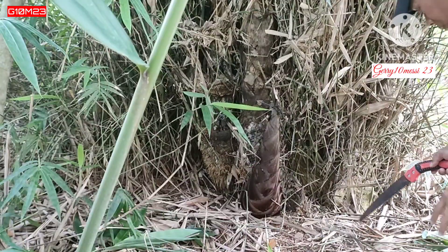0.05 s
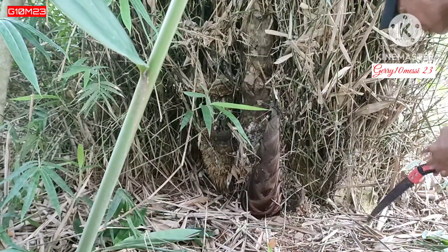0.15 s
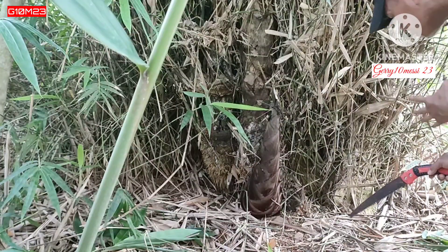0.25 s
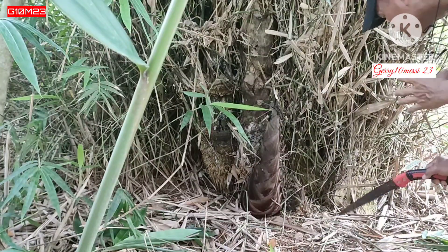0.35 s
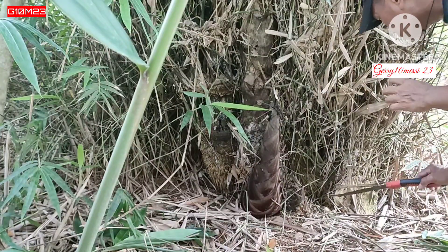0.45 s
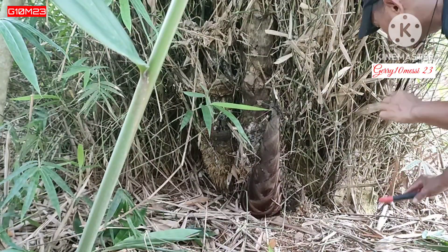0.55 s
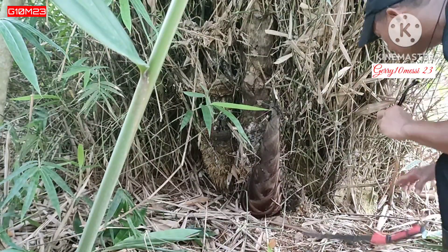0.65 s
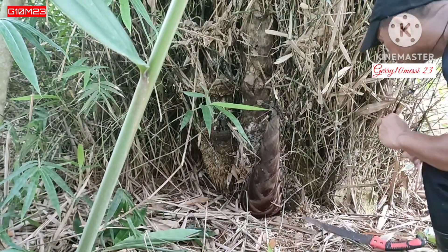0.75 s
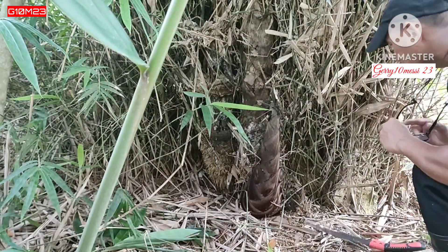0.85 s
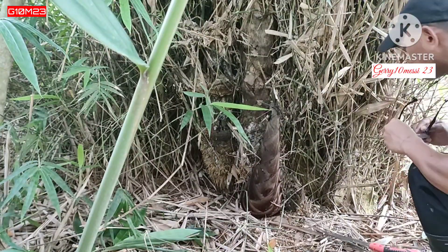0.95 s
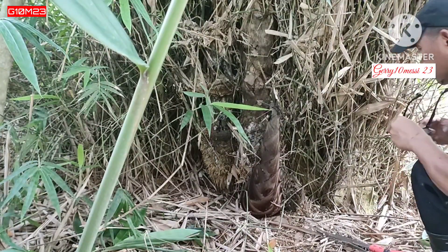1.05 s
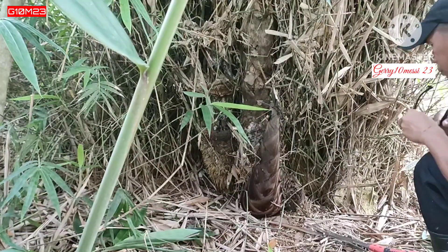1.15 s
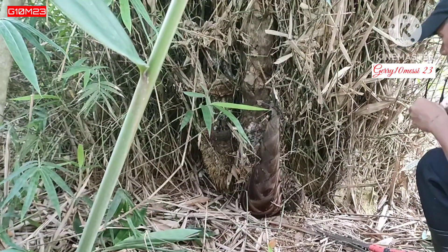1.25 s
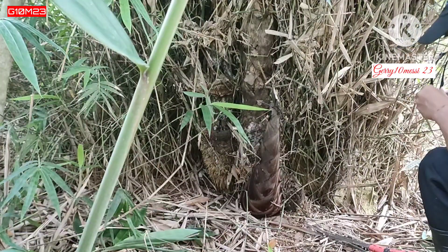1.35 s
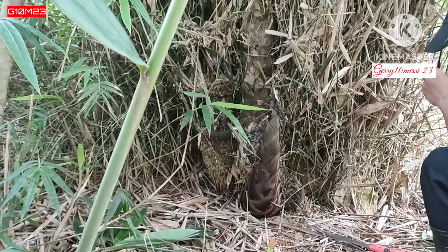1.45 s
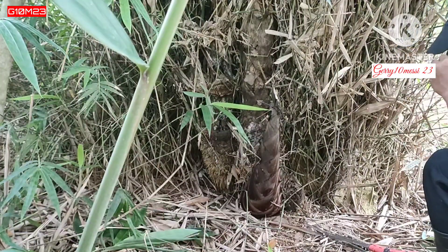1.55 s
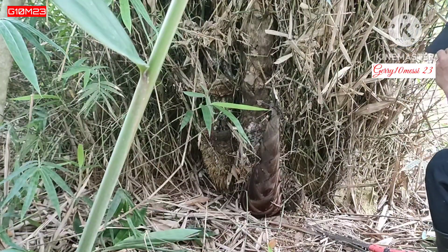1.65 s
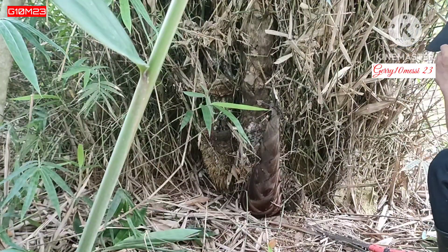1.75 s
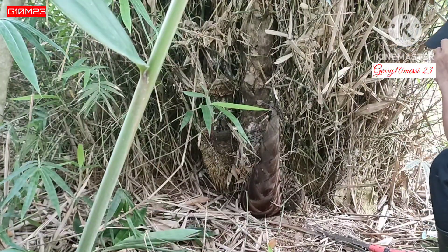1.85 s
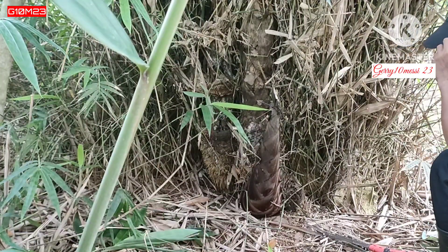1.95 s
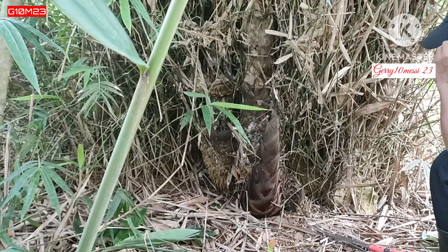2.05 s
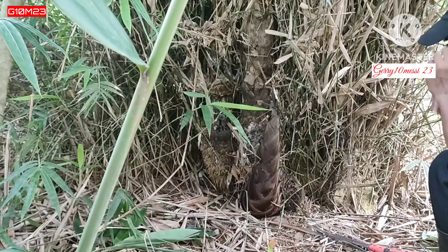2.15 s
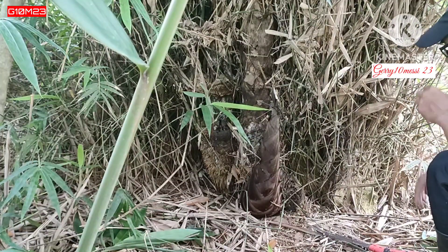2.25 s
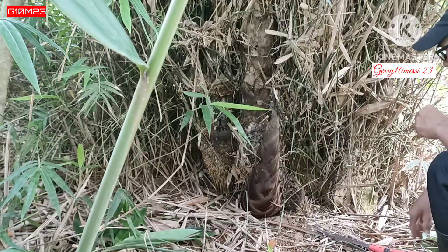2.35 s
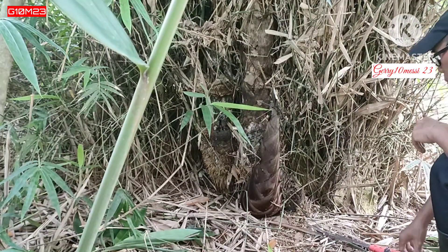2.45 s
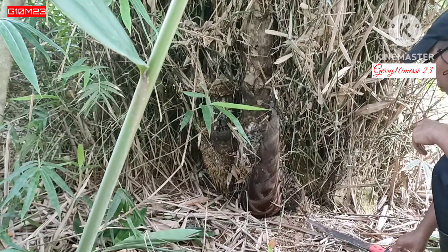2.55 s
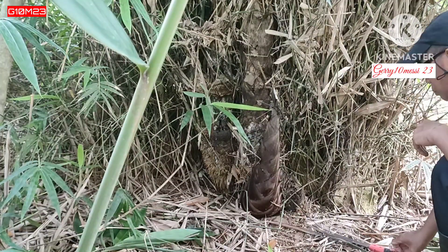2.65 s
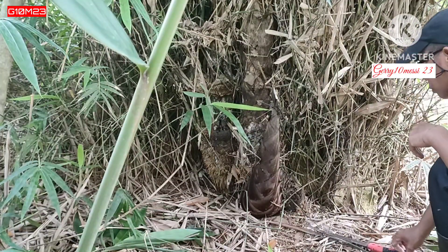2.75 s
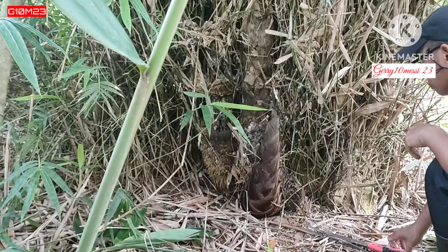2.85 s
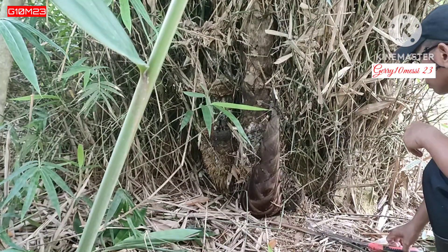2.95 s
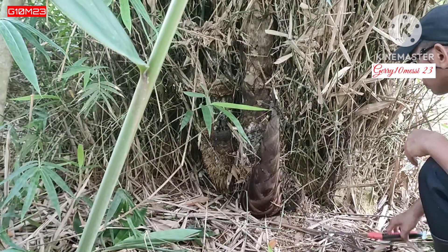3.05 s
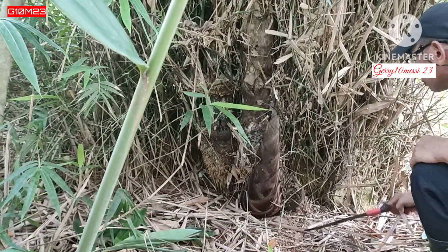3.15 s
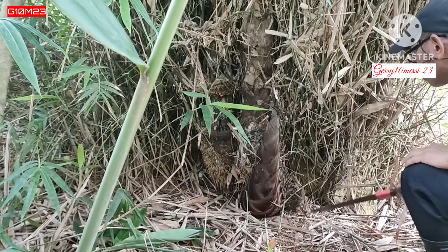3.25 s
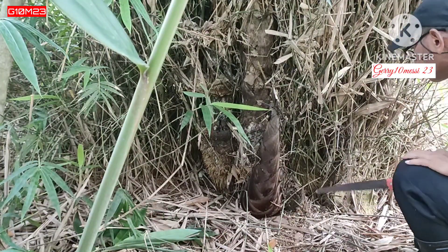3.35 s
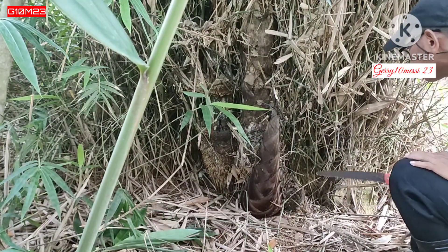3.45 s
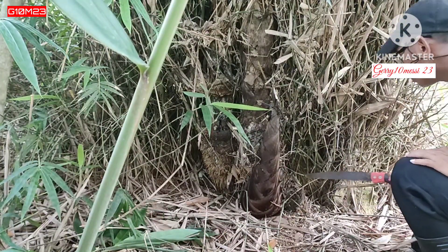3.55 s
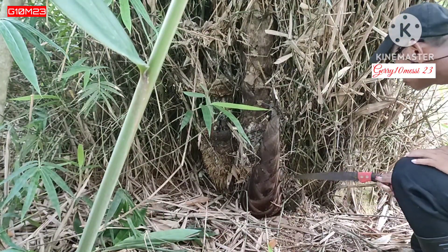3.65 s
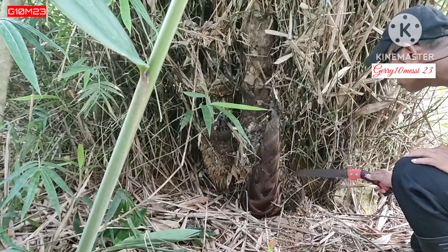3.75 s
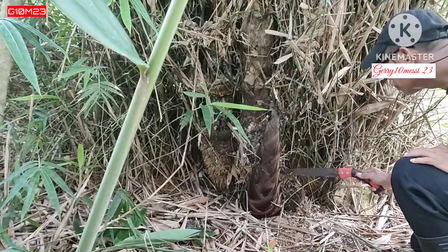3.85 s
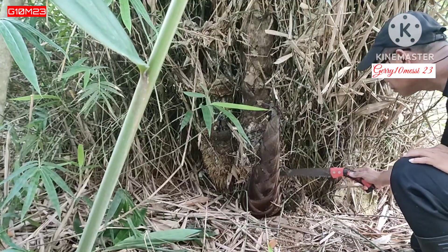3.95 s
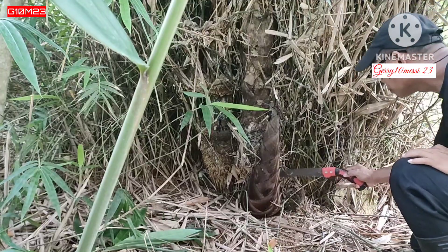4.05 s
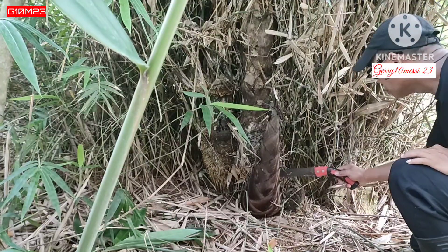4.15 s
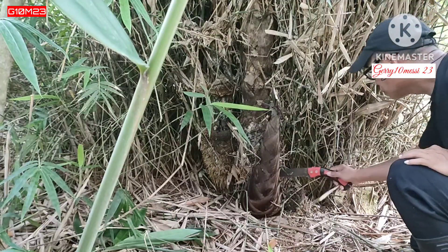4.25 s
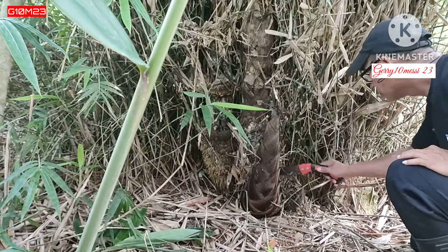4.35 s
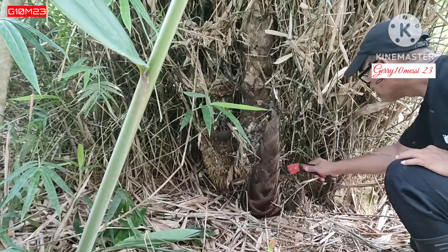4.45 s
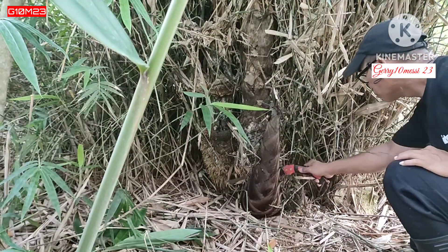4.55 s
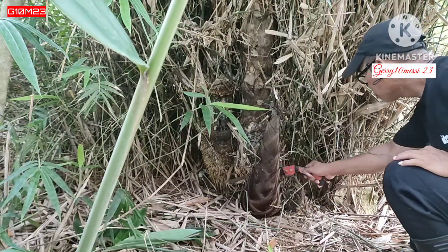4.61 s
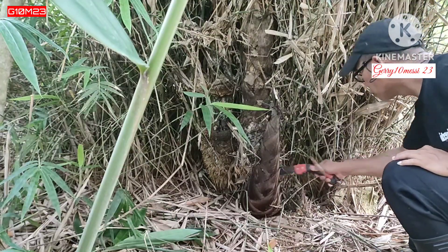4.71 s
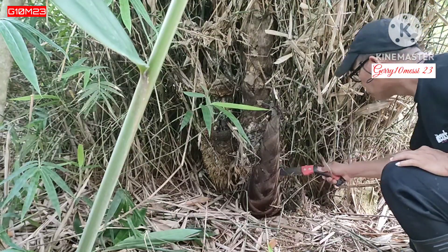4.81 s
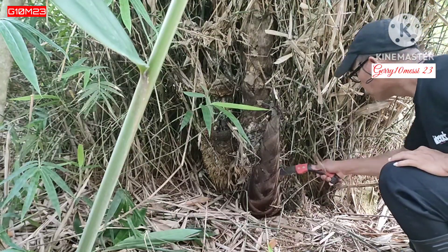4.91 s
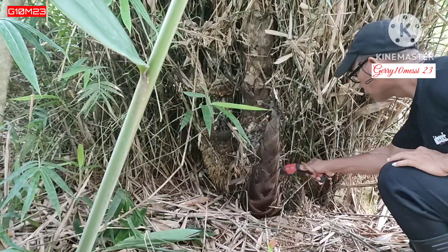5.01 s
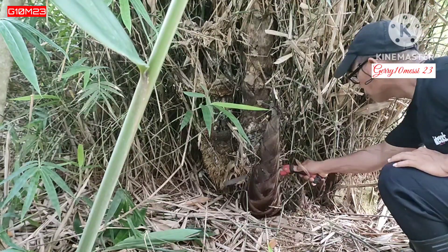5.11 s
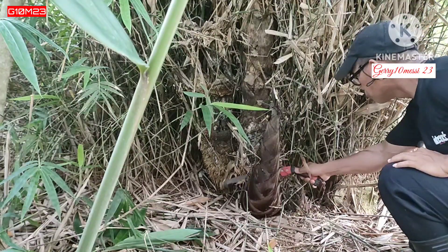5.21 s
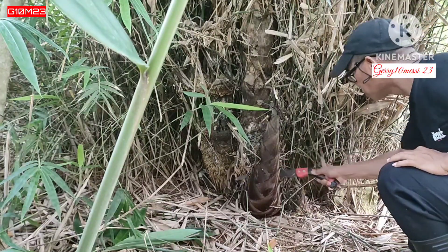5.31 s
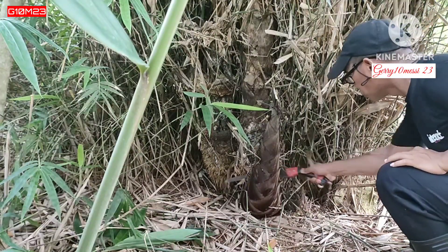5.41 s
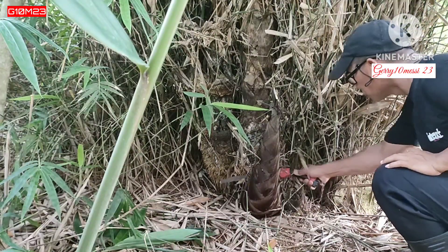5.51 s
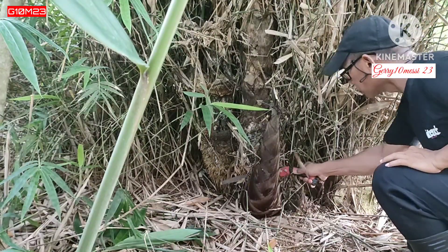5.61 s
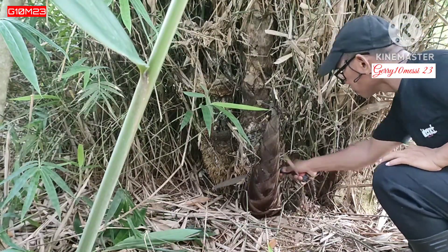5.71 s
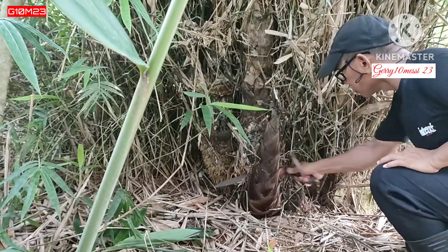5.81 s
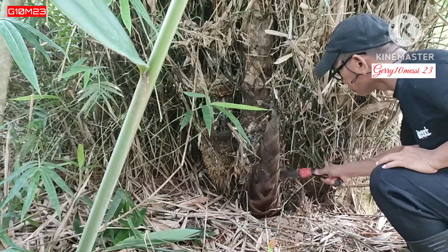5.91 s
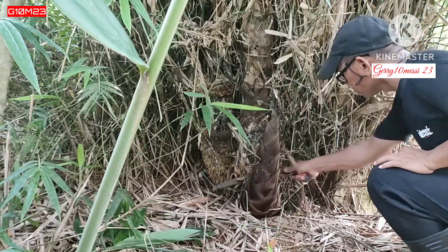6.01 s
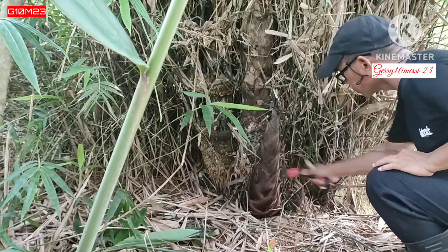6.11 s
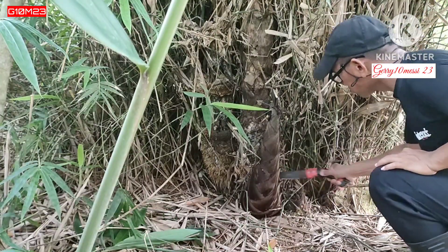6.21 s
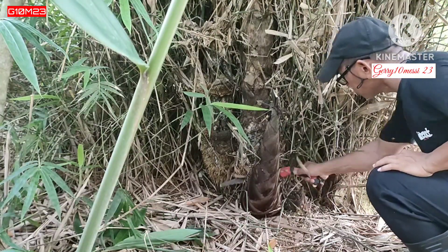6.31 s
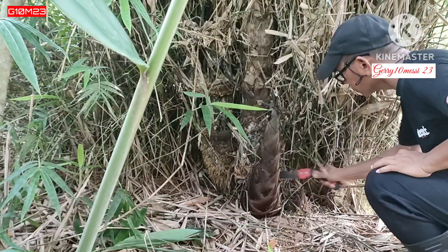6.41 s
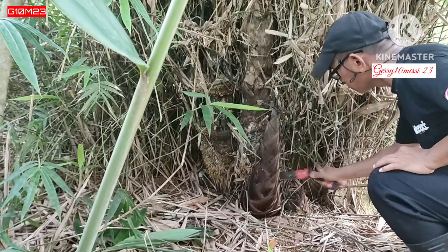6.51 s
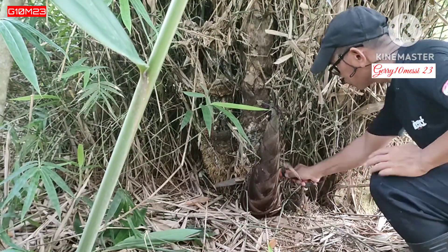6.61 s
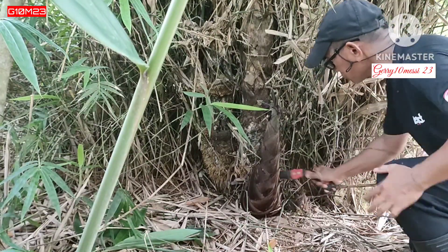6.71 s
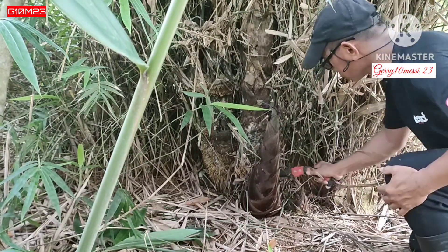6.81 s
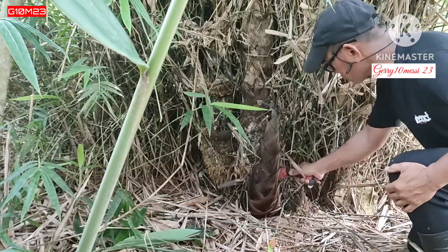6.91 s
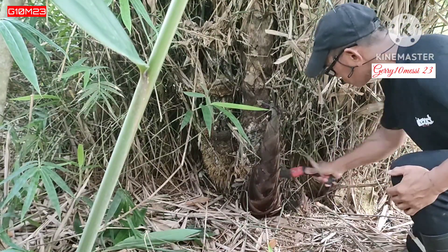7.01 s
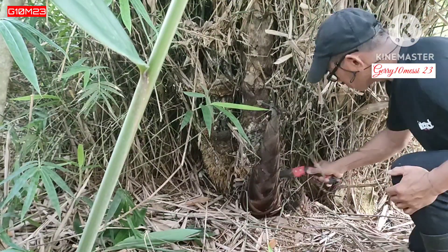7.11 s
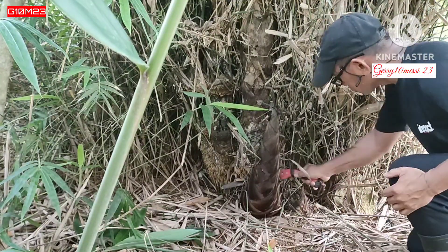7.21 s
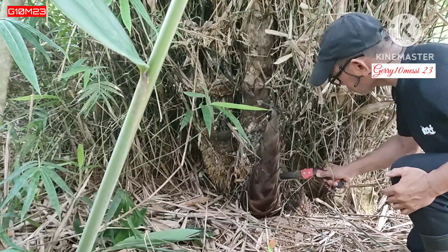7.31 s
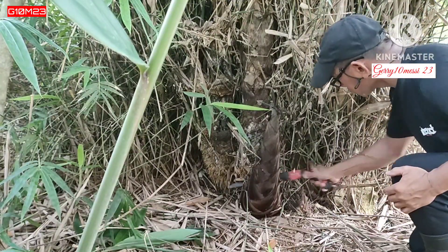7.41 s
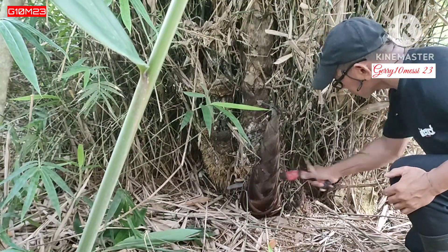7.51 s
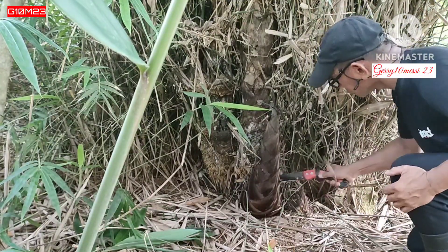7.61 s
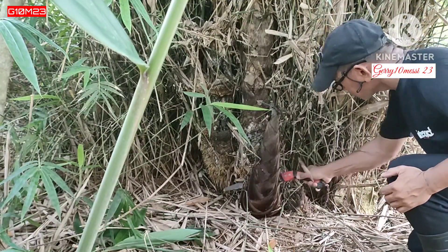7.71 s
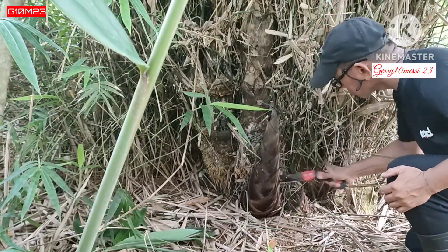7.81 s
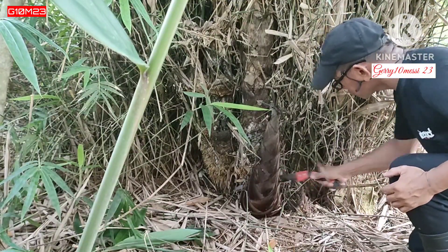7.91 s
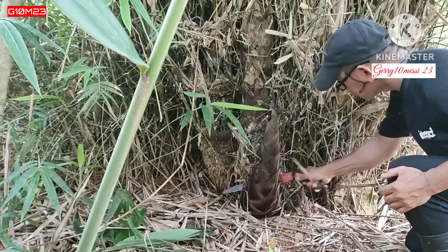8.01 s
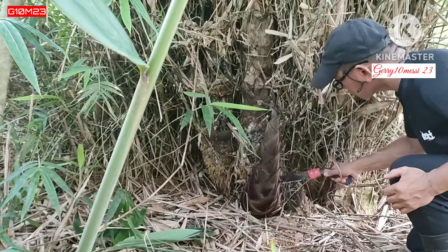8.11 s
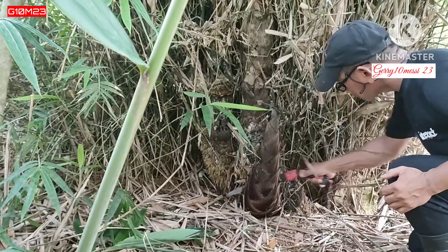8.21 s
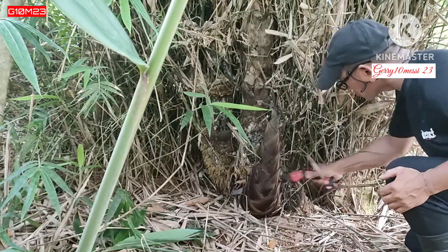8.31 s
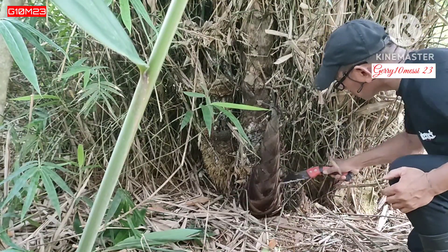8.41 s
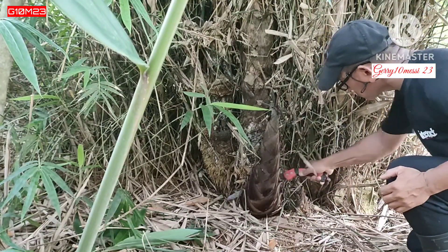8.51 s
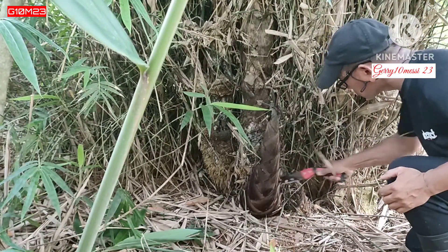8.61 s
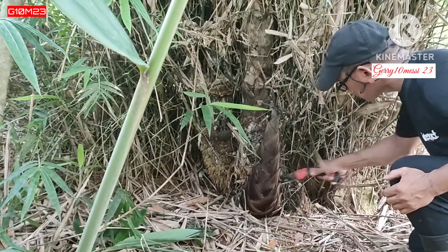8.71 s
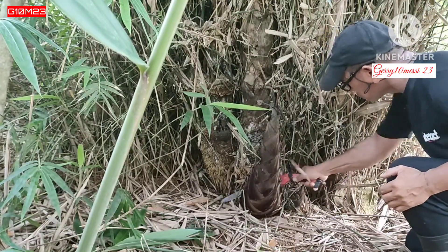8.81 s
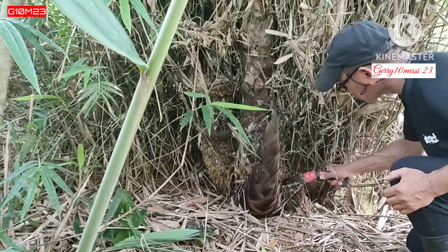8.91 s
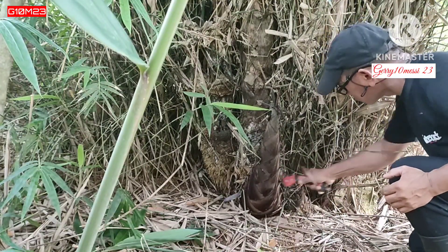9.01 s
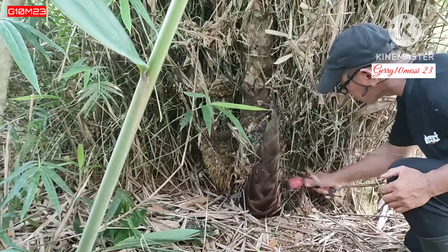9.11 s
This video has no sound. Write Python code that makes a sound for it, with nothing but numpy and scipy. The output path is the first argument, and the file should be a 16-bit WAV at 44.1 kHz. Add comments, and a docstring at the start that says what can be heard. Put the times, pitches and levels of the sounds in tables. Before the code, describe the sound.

In a bamboo grove with a low hiss of cicadas and far traffic, a microphone a couple of metres away picks up rustling dry litter and cracking twigs. A brief, faint bird call and lighter rustles follow. Then a pruning saw bites into a thick shoot with a few slow, light strokes and settles into a fast back-and-forth rasp, dotted with sharp snaps of tearing fibres.

```python
"""A bamboo grove, heard from two metres on a phone with two microphone ports and gain control.
Far traffic rumbles and cicadas hiss throughout. A pruning saw is laid on dry litter and twigs crack.
A bird calls around 2 s, then the leaves stir as the saw is picked up. From 4.4 s to 9.2 s it is drawn
to and fro through a thick shoot, cautiously at first. Its teeth tear fibres: dense ticks ring the blade,
the tooth beat drums the shoot, tough fibres snap."""
import sys
import numpy as np
from scipy import signal
from scipy.fft import rfft, irfft
from scipy.io import wavfile
from scipy.ndimage import uniform_filter1d

SR = 44100
rng = np.random.default_rng(int(sys.argv[2]) if len(sys.argv) > 2 else 0)


def materialize(psi):
    """Save the field psi as 16-bit PCM at rate SR to the path in sys.argv[1].

    A 1-D psi becomes a single channel; in a 2-D psi each row is a channel.
    """
    bounded = np.clip(np.atleast_2d(psi).T, -1, 1)
    quanta = np.round(bounded * 32767).astype(np.int16)
    wavfile.write(sys.argv[1], SR, quanta)


N = 403956


def undb(db):
    return 10 ** (np.asarray(db) / 20)


def unit(x):
    return x / np.sqrt(np.mean(x ** 2))


def colour(x, outline):
    """Causal filter with an outline of (frequency [Hz], gain [dB]), from the folded cepstrum."""
    hz, db = np.transpose(outline)
    gain_db = np.interp(np.log(np.arange(4097) * SR / 8192 + 1), np.log(hz), db)
    cepstrum = irfft(gain_db * np.log(10) / 20)
    cepstrum[1:4096] *= 2
    cepstrum[4097:] = 0
    return signal.fftconvolve(x, irfft(np.exp(rfft(cepstrum))))[:N]


def band(x, lo_hz, hi_hz, order=2):
    sos = signal.butter(order, [lo_hz, min(hi_hz, .45 * SR)], "bandpass", fs=SR, output="sos")
    return signal.sosfilt(sos, x)


def ring(x, modes):
    """A body's resonances, all driven by the same force."""
    return sum(undb(db) * np.sqrt(100 / width) * signal.lfilter(*signal.iirpeak(hz, hz / width, SR), x)
               for hz, width, db in modes)


def ticks(per_s, spread_db):
    """Random one-sample ticks, a few much larger than the rest."""
    hit = rng.random(N) < per_s / SR
    return unit(hit * rng.standard_normal(N) * undb(spread_db * np.minimum(rng.exponential(size=N), 5)))


def walk(per_s):
    """Random levels held 1 / per_s seconds and smoothed twice; spread near 1."""
    hold = int(SR / per_s)
    steps = np.repeat(rng.standard_normal(N // hold + 1), hold)
    return 1.3 * uniform_filter1d(uniform_filter1d(steps, hold), hold)[:N]


def cracks(events, cycles, tail_s, tail_db):
    """Each crack is a few damped cycles at its pitch and a short noisy tail."""
    out, t = np.zeros(N + SR // 10), np.arange(SR // 10) / SR
    for s, db, hz in events:
        tail = band(rng.standard_normal(len(t)), hz / 2.3, hz * 1.94) * np.exp(-t / tail_s)
        burst = np.sin(2 * np.pi * hz * t) * t * hz / cycles * np.exp(1 - t * hz / cycles)
        out[int(s * SR):int(s * SR) + len(t)] += undb(db) * (burst + undb(tail_db) * tail)
    return out[:N]


def traffic_and_air():
    """Far traffic rumbles alike at both ports; the hiss of the air is unlike at each."""
    # spectrum of the grove's background: (frequency [Hz], relative level [dB])
    spectrum = [(12, -42), (20, -2.5), (50, -3.5), (163, -15.5), (257, -25), (1080, -41.5), (1610, -42),
                (1950, -40.5), (2310, -41.5), (4100, -44.5), (6000, -48), (7800, -78), (13200, -120)]
    mid, side = (colour(rng.standard_normal(N), spectrum + [(7000, -100)]) for _ in range(2))
    side = side * undb(-18) + signal.sosfilt(signal.butter(1, 400, "highpass", fs=SR, output="sos"), side)
    ports = np.array([undb(-.5) * (mid + side), undb(-2) * (mid - side)])
    return unit(ports) * undb(-46.5 + 1.95 * walk(2.83))


def cicadas():
    """A chorus on all sides: dense clicks merge into a throbbing hiss."""
    # spectrum of the chorus: (frequency [Hz], relative level [dB])
    spectrum = [(5800, -32), (6400, -10.5), (6850, -2.5), (7400, -9), (7900, -25), (8300, -66),
                (12000, -46), (13000, -27), (14800, -22.5), (15800, -56)]
    chorus = np.array([unit(colour(ticks(4000, .42) * undb(.89 * walk(45)), spectrum)) for _ in range(2)])
    return chorus * undb(-47 + .23 * walk(1.5))


def bird():
    """Husky whistles that waver and hang among the stems."""
    # one contour a note: (time [s], pitch [Hz], level [dB])
    notes = [
        [(1.82, 5240, -68), (1.84, 5150, -48), (1.9, 5050, -72)],
        [(1.87, 3170, -53), (1.89, 3800, -52), (1.92, 4330, -45), (1.96, 4445, -43.5), (2.03, 4490, -72),
         (2.09, 4470, -72)],
        [(1.5, 992, -74), (1.7, 1005, -81), (1.8, 1040, -67), (1.95, 1040, -72), (2.17, 872, -76),
         (2.3, 856, -82)],
        [(2.5, 3700, -72), (2.55, 3350, -69), (2.62, 3150, -73)],
    ]
    t, song = np.arange(N) / SR, 0
    for note in notes:
        s, hz, db = np.transpose(note)
        phase = 2 * np.pi * np.cumsum(np.interp(t, s, hz) * (1 + .02 * walk(150))) / SR
        song = song + undb(np.interp(t, s, db, -120, -120) + 2.6 * walk(40.1)) * np.sin(phase)
    tail = rng.standard_normal(SR // 4) * np.exp(-t[:SR // 4] / .027)
    return song + undb(.5) * signal.oaconvolve(song, tail / np.linalg.norm(tail))[:N]


def litter():
    """Hands and boots stir dry leaves, which crackle in dense grains; stalks add a duller scrape."""
    # stirs: (peak time [s], level [dB], 20 dB rise [s], 20 dB fall [s], stalks against leaves [dB])
    rustles = [(0.0, -39, .05, .15, -14), (0.105, -30, .02, .35, -11), (0.23, -27.5, .02, .15, -10),
               (0.275, -29, .08, .06, -11), (0.42, -34, .14, .3, -13), (0.61, -37, .05, .3, -15),
               (0.767, -43, .04, .1, -12), (0.825, -28, .03, .11, -13), (1.05, -42, .12, .19, -13),
               (1.184, -46, .08, .35, -12), (1.373, -51, .1, .5, -13), (1.669, -56, .2, .15, -11),
               (2.616, -54, .2, .3, -11), (2.85, -47.5, .18, .12, -10), (3.03, -50, .05, .12, -18),
               (3.16, -51, .08, .15, -13), (3.25, -48, .1, .15, -13), (3.34, -47, .12, .15, -10),
               (3.53, -43, .18, .2, -14), (3.815, -41, .15, .14, -14), (3.9, -46, .04, .2, -17),
               (4.094, -59, .1, .18, -8)]
    # spectrum of dry leaves: (frequency [Hz], relative level [dB])
    leaves = [(710, -43), (1200, 0), (1950, -0.5), (2510, 1), (3210, 1.5), (5860, 4.5), (7710, -25),
              (8480, -7), (15000, -10)]
    peak_s, level_db, rise_s, fall_s, stalk_db = np.transpose(rustles)[:, :, None]
    steps = np.arange(0, N, 64)
    leaf_db = level_db - 20 * np.maximum((steps / SR - peak_s) / fall_s, (peak_s - steps / SR) / rise_s)
    stir = lambda db: np.interp(np.arange(N), steps, np.linalg.norm(undb(db), axis=0))
    grains = (ticks(4000, 1.3) + .5 * ticks(500, 1.7)) * undb(2 * walk(30))
    scrape = unit(band(grains, 310, 2340)) * stir(leaf_db + stalk_db)
    return unit(colour(grains, leaves)) * stir(leaf_db) + scrape


def twigs():
    """Twigs on the ground crack and knock."""
    # cracks and knocks: (time [s], level [dB], pitch [Hz])
    hits = [(0.093, -29, 5300), (0.11, -19.5, 3700), (0.152, -17.5, 3850), (0.222, -16.5, 5870),
            (0.763, -31, 2070), (0.814, -13.5, 5300), (1.18, -30.5, 2800), (1.384, -41, 3340),
            (2.875, -39, 393), (3.555, -44, 476), (3.57, -47, 477), (3.59, -40.5, 470)]
    return cracks(hits, cycles=.91, tail_s=.0042, tail_db=-3.5)


def bumps():
    """The handle meets the ground with a dull bump; later the blade binds with another."""
    # bumps: (time [s], level [dB], pitch [Hz])
    hits = [(.845, -41, 353), (6.455, -31, 230)]
    return cracks(hits, cycles=2, tail_s=.02, tail_db=-20)


def fibre_snaps():
    """Tough fibres snap sharply under the teeth."""
    # snaps: (time [s], level [dB], pitch [Hz])
    snaps = [(4.2478, -42, 1770), (4.7456, -29, 5130), (5.2733, -28.5, 1900), (5.3672, -18, 2597),
             (5.9524, -12.5, 2190), (6.2345, -13, 3527), (6.373, -21, 2200), (6.5287, -25, 2920),
             (6.6538, -13.5, 2626), (6.8168, -11, 5560), (7.1367, -10, 3316), (7.1605, -8.5, 4565),
             (7.397, -12, 5700), (7.6418, -5, 3500), (7.665, -4.5, 5530), (7.9144, -2, 3380),
             (7.9713, -9, 3360), (8.0406, -19, 3300), (8.2487, -11, 3450), (8.2714, -16, 3485),
             (8.312, -19, 2500), (8.4539, -5.5, 3430), (8.584, -20, 2500), (8.7293, -10, 3160),
             (8.7784, -5, 3597), (8.876, -14, 2800), (8.992, -18, 3200), (9.0108, -16, 3330),
             (9.1267, -16, 3110)]
    return cracks(snaps, cycles=.69, tail_s=.0014, tail_db=-23)


def arm_force(start, end, middle_db, is_pull):
    """Force rises as the teeth bite and dies as the arm turns. Also gives each sample's stroke number."""
    t, span = np.arange(N) / SR, end - start
    entry_db = middle_db + np.where(is_pull, -1, -3)
    exit_db = middle_db + np.where(is_pull, -4, -3)
    bite = start - .006 - .6 * span ** 2  # long, cautious strokes begin gently
    times = [bite, start + .0059, start + span / 6, start + span / 2,
             end - span / 6, end - .004, end + .014]
    levels = [entry_db - 18, entry_db - 3, entry_db, middle_db, exit_db, exit_db - 3, exit_db - 18]
    force_db = np.interp(t, np.maximum.accumulate(np.ravel(times, "F")), np.ravel(levels, "F"))
    stroke = np.clip(np.searchsorted(bite - .015, t) - 1, 0, None)
    moving = uniform_filter1d(1. * (t > bite[0]) * (t < end[stroke] + .04), 400)
    return moving * undb(force_db + .82 * walk(60)), stroke


def saw():
    """Within each stroke the teeth beat and tear fibres, ringing the blade and drumming the shoot."""
    # push and pull in turn, a push first: (start [s], end [s], level [dB], nominal tooth beat [Hz])
    strokes = [(4.361, 4.736, -43, 194.4), (4.817, 4.951, -38, 204), (5.011, 5.282, -43.5, 191.2),
               (5.362, 5.486, -34.5, 292.6), (5.522, 5.628, -36, 215.8), (5.654, 5.702, -39, 191),
               (5.816, 5.916, -34, 248), (5.948, 6.061, -28, 319.5), (6.106, 6.204, -32, 317.6),
               (6.226, 6.338, -26, 350.5), (6.369, 6.482, -29.5, 247), (6.518, 6.619, -28, 285.4),
               (6.651, 6.769, -30.5, 348), (6.81, 6.943, -30.5, 218.6), (6.945, 7.123, -31, 341.6),
               (7.131, 7.231, -29, 294.7), (7.268, 7.366, -32, 243.5), (7.391, 7.492, -28, 305.3),
               (7.52, 7.605, -30, 248.8), (7.638, 7.733, -27, 318.3), (7.776, 7.869, -29.5, 247.1),
               (7.899, 8.006, -29, 329), (8.038, 8.137, -31, 319.7), (8.167, 8.278, -30, 349),
               (8.307, 8.407, -30.5, 322.6), (8.439, 8.546, -29, 325.7), (8.58, 8.681, -30.5, 256.6),
               (8.704, 8.81, -29, 321.5), (8.858, 8.944, -29, 325.5), (8.992, 9.088, -27, 275.8),
               (9.125, 9.155, -33.5, 209.7)]
    # colour of a pull as the cut deepens, against the stroke's level:
    # (time [s], shoot [dB], kerf [dB], edge [dB], groan within the shoot [dB], blade hum [dB])
    depth = [(4.5, -21, -5, -7, -12, -13), (5.1, -19, -4, -6.5, -12, -11), (5.5, -16, -3.5, -3, -12, -17),
             (6.2, -13, -3, -3, -13, -18), (6.7, -13, -6, -2, -11, -20), (7.05, -13.5, -9, 1.5, -8, -22),
             (7.6, -12.5, -8, -4.5, -5, -22), (8.2, -8.5, -7, -1.5, -11, -22),
             (9.1, -10.5, -6, -4, -14, -22)]
    # resonances of the blade: (frequency [Hz], width [Hz], level [dB])
    blade_modes = [(1330, 82, -10), (1410, 33, -11), (2075, 350, 25), (2730, 260, 8.5), (3215, 200, 10),
                   (4120, 200, -3), (4750, 140, -8), (5440, 570, 14)]
    # resonances of the shoot: (frequency [Hz], width [Hz], level [dB])
    shoot_modes = [(473, 80, -2), (625, 380, -4), (990, 250, -2)]
    # a push loads the shoot, adding: (shoot [dB], kerf [dB], edge [dB], groan [dB], blade hum [dB])
    push_db = (6.5, 2, -1, 6, 0.1)
    start, end, middle_db, teeth_hz = np.transpose(strokes)
    is_pull = np.arange(len(start)) % 2
    force, stroke = arm_force(start, end, middle_db, is_pull)
    depth_s, *pull_db = np.transpose(depth)
    part_db = [np.interp(start, depth_s, db) + push * (1 - is_pull) for db, push in zip(pull_db, push_db)]
    shoot_gain, kerf_gain, edge_gain, groan_gain, hum_gain = (
        undb(uniform_filter1d(db[stroke], 400)) for db in part_db)
    # the arm is quickest early in the stroke, so the tooth beat arches and sags
    progress = np.clip((np.arange(N) / SR - start[stroke]) / (end - start)[stroke], 0, 1)
    beat_hz = teeth_hz[stroke] * (1.03 - .5 * (progress - .35) ** 2) * (1 + .07 * walk(100))
    teeth_passed = np.cumsum(beat_hz) / SR
    impacts = np.diff(np.floor(teeth_passed), prepend=0) * undb(3 * rng.standard_normal(N)) * force
    beat = (1 + .048 * np.cos(2 * np.pi * teeth_passed)) * force
    shared_ticks = ticks(400, 2.2)

    def tearing(lo_hz, hi_hz, modes, ring_db):
        """Tearing noise in one range with the resonances that lie there."""
        tear = (ticks(6000, 2.1) + .5 * shared_ticks) * beat * undb(.31 * walk(25))
        return unit(unit(band(tear, lo_hz, hi_hz, order=3)) + undb(ring_db) * unit(ring(tear, modes)))

    kerf = tearing(1080, 2400, blade_modes[:3], ring_db=-5)
    blade = tearing(2400, 4300, blade_modes[3:6], ring_db=-10)
    edge = tearing(4300, 6400, blade_modes[6:], ring_db=-6)
    # fine dust and shaken leaves hiss on top and swell less than the cut
    edge += undb(-11.5) * unit(band(ticks(9000, 2.2) * force ** .67, 7700, 14600))
    # the harder the shoot is loaded, the more it groans at the tooth beat
    groan = unit(band(impacts, 170, 373)) + undb(-2) * unit(band(impacts, 346, 754))
    shoot = unit(tearing(284, 1510, shoot_modes, ring_db=-1) + groan_gain * groan)
    # the blade's free length hums most while the cut is shallow
    hum = tearing(1100, 1450, blade_modes[:1], ring_db=-3)
    mix = undb(.5) * blade + kerf_gain * kerf + edge_gain * edge + shoot_gain * shoot + hum_gain * hum
    return np.sqrt(np.mean(force ** 2)) * mix


def thicket(x, wet_db, decay_s, split_hz):
    """Swaying stems and moving hands scatter the treble to each port by paths that keep changing."""
    t = np.arange(SR // 16) / SR
    low = signal.sosfilt(signal.butter(1, split_hz, fs=SR, output="sos"), x)
    treble = x - low
    ports = np.array([low + .4 * treble] * 2)
    for port in ports:
        paths = np.array([walk(25) for _ in range(5)])
        for weight in paths / np.linalg.norm(paths, axis=0):
            echo = rng.standard_normal(len(t)) * (np.exp(-t / decay_s) + undb(-18) * np.exp(-t / .062))
            port += undb(wet_db) * signal.oaconvolve(weight * treble, echo / np.linalg.norm(echo))[:N]
    return ports


def scene():
    """The work and the bird reach the microphone through the stems, over traffic and cicadas."""
    near = saw() + fibre_snaps() + litter() + twigs() + bird() + bumps()
    balance = undb([[.25], [-.25]])  # the man crouches a little to the left of the ports
    return thicket(near, wet_db=-.5, decay_s=.0044, split_hz=1980) * balance + traffic_and_air() + cicadas()


def record(dry):
    """The phone turns its gain down while the saw is loud and cuts the top."""
    response_s, knee_db, top_hz = .35, -30.5, 15700
    pole = np.exp(-1 / (response_s * SR))
    loudness = np.sqrt(signal.lfilter([1 - pole], [1, -pole], np.mean(dry ** 2, axis=0)) + 1e-12)
    gain = undb(3.5) * (1 + loudness / undb(knee_db)) ** -.6
    return signal.sosfilt(signal.ellip(10, .2, 80, top_hz, fs=SR, output="sos"), gain * dry)


dry = scene()
out = record(dry)
materialize(out)
```